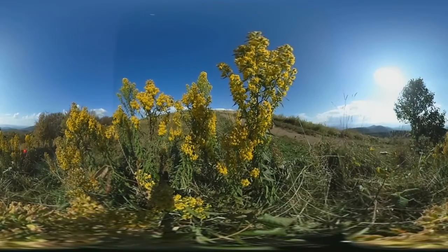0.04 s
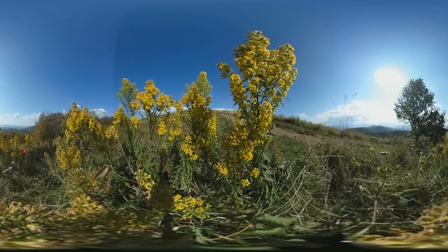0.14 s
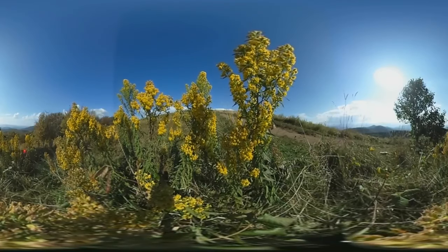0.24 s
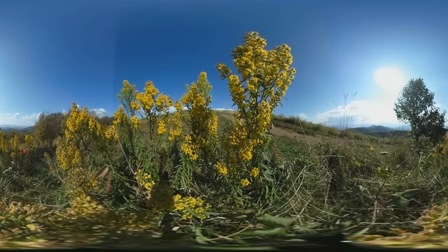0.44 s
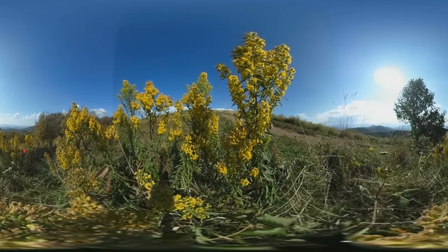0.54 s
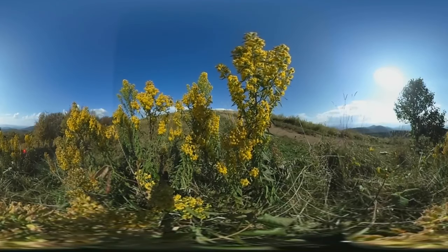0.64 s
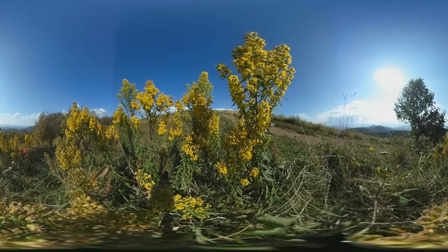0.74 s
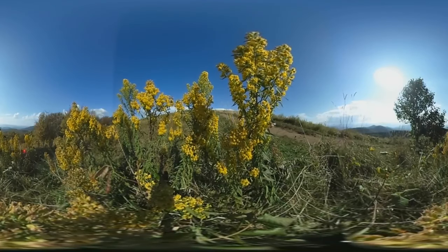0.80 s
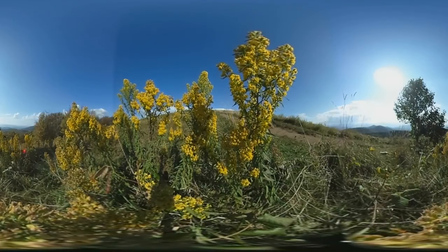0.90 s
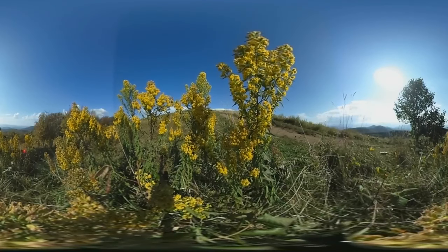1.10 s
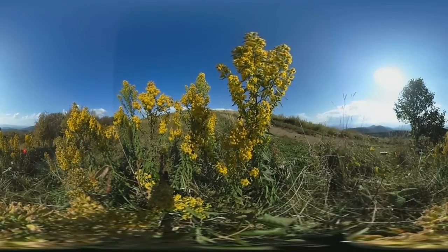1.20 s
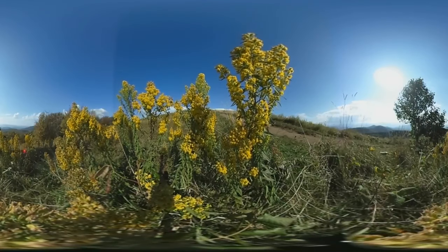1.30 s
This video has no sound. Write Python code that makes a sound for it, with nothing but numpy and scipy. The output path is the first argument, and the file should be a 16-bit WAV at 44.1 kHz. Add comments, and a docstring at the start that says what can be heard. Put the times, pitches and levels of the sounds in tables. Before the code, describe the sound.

High, steady cricket chirping in a grassy field as a light breeze bumps the microphone.

```python
"""Crickets sing throughout in a sunny meadow, over a faint, even hiss. A few near ones stroke their wings
at steady rates, each stroke a short high tone that arches in pitch and scatters in the grass; a chorus
and two lower trills lie further off. Dry stems rustle softly at the start and now and then after.
A light breeze buffets the microphone, with eddies thumping from 0.4 to 1.1 s, hardest at 0.65 s,
and eases towards the end."""
import sys
import numpy as np
from scipy import signal
from scipy.fft import rfft, irfft
from scipy.io import wavfile

SR = 44100
rng = np.random.default_rng(int(sys.argv[2]) if len(sys.argv) > 2 else 0)


def file_out(sig):
    """Save sig as 16-bit WAV at sys.argv[1]."""
    # one column per channel
    cols = np.atleast_2d(sig).T
    # limit, then scale
    lim = np.clip(cols, -1, 1)
    pcm = np.round(lim * 32767).astype(np.int16)
    wavfile.write(sys.argv[1], SR, pcm)


N = 59535
TIME = np.arange(N) / SR


def from_db(db):
    """Decibels to gain."""
    return 10 ** (np.asarray(db) / 20)


def unit_rms(x):
    """Scale to unit rms."""
    return x / np.sqrt(np.mean(x ** 2) + 1e-20)


def coloured_noise(spectrum):
    """Unit-rms noise shaped by (Hz, dB) points, empty up to 10 Hz."""
    hz, db = np.transpose(spectrum)
    bin_hz = np.maximum(np.fft.rfftfreq(N, 1 / SR), 1)
    gain = from_db(np.interp(np.log(bin_hz), np.log(hz), db)) * (bin_hz > 10)
    return unit_rms(irfft(rfft(rng.standard_normal(N)) * gain, N))


def drift(corner_hz):
    """Smooth random wander, unit rms."""
    bin_hz = np.fft.rfftfreq(N, 1 / SR)
    return unit_rms(irfft(rfft(rng.standard_normal(N)) / (1 + (bin_hz / corner_hz) ** 2), N))


# Hiss spectrum. Each row: frequency in Hz, relative density in dB.
HISS_SPECTRUM = [(30, 0.5), (150, 0.5), (300, -0.5), (550, -4), (1100, -7.5), (2000, -11.5), (3200, -14),
                 (4500, -15), (6800, -16), (9500, -17), (10800, -12), (12000, -14)]


def hiss(level_db=-63.5):
    """Faint, even hiss of the field."""
    return from_db(level_db) * coloured_noise(HISS_SPECTRUM)


# Stem rustles. Each row: peak time in seconds, level in dB, half-width in seconds, centre in Hz.
STEM_RUSTLES = [(0.05, -67, 0.0022, 1680), (.061, -65, 0.0022, 1810), (0.5, -71, 0.014, 1000),
                (0.84, -76, 0.052, 1750), (1.22, -65, 0.0034, 1520), (1.345, -67, 0.012, 810)]


def rustle(peak_s, level_db, half_width_s, centre_hz, fall_db_per_octave=16.5):
    """One dry stem brushes another: a brief swell of band noise."""
    spectrum = [(centre_hz * 2.0 ** octave, -fall_db_per_octave * abs(octave)) for octave in (-4, 0, 4)]
    swell = np.exp(-((TIME - peak_s) / half_width_s) ** 2)
    return from_db(level_db) * swell * coloured_noise(spectrum)


# Breeze strength. Each row: time in seconds, relative level in dB.
BREEZE_CURVE = [(0.0, -41.5), (0.03, -55.5), (0.292, -47), (0.318, -54), (0.454, -38), (0.522, -57),
                (0.654, -37), (0.68, -49), (0.74, -37), (0.782, -46), (0.8, -42), (0.872, -51),
                (0.936, -38.5), (1.06, -50), (1.112, -44.5), (1.154, -58.5), (1.248, -50), (1.35, -56)]
# Wind rumble spectrum. Each row: frequency in Hz, relative density in dB.
RUMBLE_SPECTRUM = [(12, -7), (25, -4), (45, 3), (80, -7), (120, -13), (160, -22.5), (250, -29.5),
                   (500, -41.5), (1500, -68)]


def wind(mean_db=-50, swing_share=0.94):
    """Wind on the microphone: a rumble that follows the breeze."""
    breeze_db = np.interp(TIME, *np.transpose(BREEZE_CURVE))
    swing_db = swing_share * (breeze_db - breeze_db.mean())
    return from_db(mean_db + swing_db) * coloured_noise(RUMBLE_SPECTRUM)


# Single eddies. Each row: peak time in seconds, peak level in dB, centre in Hz.
EDDY_THUMPS = [(0.383, -43.5, 86), (0.438, -34.5, 53), (.556, -43.5, 82), (0.606, -44.5, 65.5),
               (.647, -24.5, 77), (.799, -31.5, 92), (0.929, -39.5, 66.6), (.959, -41, 98),
               (1.004, -42.5, 87.5), (1.104, -39, 73)]


def eddy(peak_s, peak_db, centre_hz):
    """An eddy thumps the microphone: one pressure bump between two dips."""
    offset_squared = (np.pi * centre_hz * (TIME - peak_s)) ** 2
    return from_db(peak_db) * (1 - 2 * offset_squared) * np.exp(-offset_squared)


# Chorus spectrum. Each row: frequency in Hz, relative density in dB.
CHORUS_SPECTRUM = [(6900, -26), (7400, -18), (7700, -2), (8050, 2.5), (8450, 6.5), (8900, 11), (9150, -8.5),
                   (9500, -24)]


def chorus(level_db=-65):
    """Distant crickets merge into a steady band of high noise."""
    return from_db(level_db) * coloured_noise(CHORUS_SPECTRUM)


def grass_scatter(direct, scatter_db, t60_s=0.028):
    """Add a short, dense tail of reflections from the stems."""
    tail = rng.standard_normal(N) * from_db(-60 * TIME / t60_s)
    tail /= np.sqrt(np.sum(tail ** 2))
    return direct + from_db(scatter_db) * signal.fftconvolve(direct, tail)[:N]


# Crickets, near to far. Each row: middle of first stroke in seconds, strokes per second, mid-stroke
# pitch in Hz, rms level in dB, stroke length in seconds, pitch sag at the ends in Hz, glide over the
# stroke in Hz, pitch jitter in Hz, scatter relative to direct sound in dB.
CRICKET_SONGS = [(0.01201, 20.72, 8480, -62, 0.032, 800, -100, 81, -7.5),
                 (.138, 6.64, 8940, -67, 0.023, 650, -450, 55, -12.5),
                 (0.043, 18.25, 8150, -65, .032, 690, -300, 75, -9),
                 (0.01205, 19.75, 8880, -68.5, 0.031, 500, -100, 79, 0),
                 (0.018, 16, 7450, -80, .026, 240, -100, 91, -1),
                 (.004, 68.44, 5380, -78.5, 0.01, 300, -300, 135, -1.5),
                 (0.0053, 39.04, 3820, -81, .018, 120, -54, 85, -3.5)]


def cricket(first_s, strokes_per_s, pitch_hz, level_db, length_s, sag_hz, glide_hz, jitter_hz, scatter_db):
    """Each wing stroke speeds up and slows down, so its tone swells and arches in pitch."""
    spread_s, spread_db, spread_hz = 0.0403 * length_s, 0.94, 45   # stroke to stroke
    stroke = np.round((TIME - first_s) * strokes_per_s).astype(int)
    later, louder, higher = rng.standard_normal(size=(128, 3))[stroke].T
    middle_s = first_s + stroke / strokes_per_s + spread_s * later
    position = np.clip(2 * (TIME - middle_s) / length_s, -1, 1)   # -1 at stroke start, 1 at end
    arch_hz = pitch_hz - sag_hz * position ** 2 + glide_hz * position / 2
    hz = arch_hz + spread_hz * higher + jitter_hz * drift(corner_hz=400)
    roughness = 1 + 0.23 * drift(corner_hz=300)   # scraper runs unevenly over the file
    swell = from_db(spread_db * louder) * np.cos(np.pi / 2 * position)
    song = swell * roughness * np.sin(2 * np.pi * np.cumsum(hz) / SR)
    return from_db(level_db) * unit_rms(grass_scatter(song, scatter_db))


def scene():
    """Crickets and chorus over hiss, wind and stems, in mono."""
    insects = sum(cricket(*row) for row in CRICKET_SONGS) + chorus()
    air = hiss() + wind() + sum(eddy(*row) for row in EDDY_THUMPS)
    stems = sum(rustle(*row) for row in STEM_RUSTLES)
    return (insects + air + stems)[None]


def record(dry):
    """Steep low-pass on the top treble."""
    cutoff_hz = 12100
    lowpass = signal.firwin(601, cutoff_hz, fs=SR, window="blackman")
    return signal.fftconvolve(dry, lowpass[None], "same")


dry = scene()
out = record(dry)
file_out(out)
```